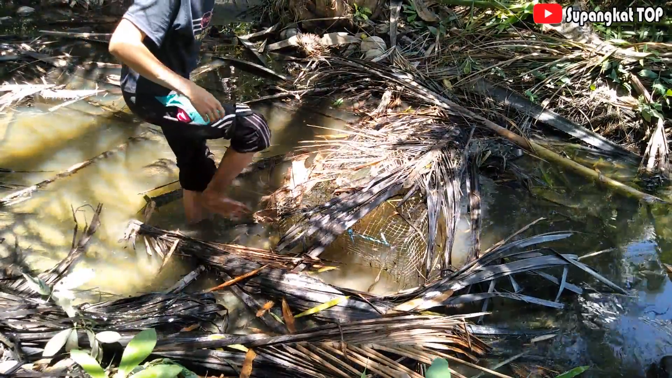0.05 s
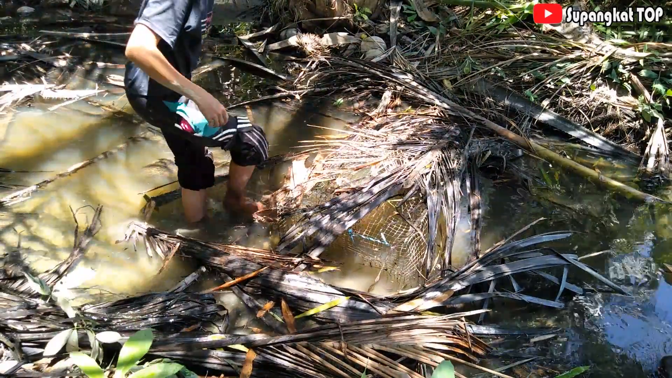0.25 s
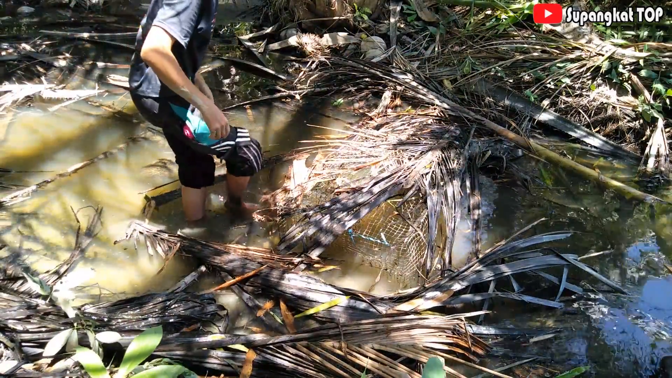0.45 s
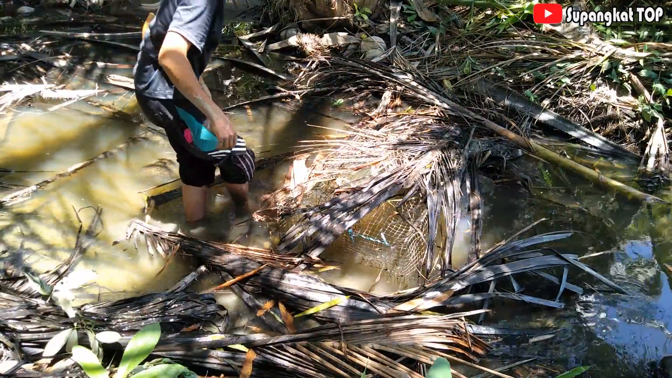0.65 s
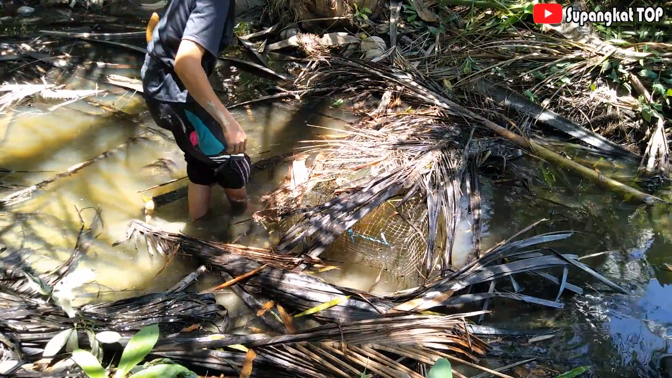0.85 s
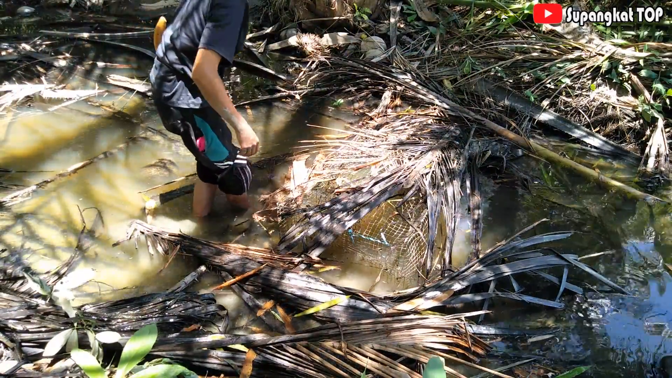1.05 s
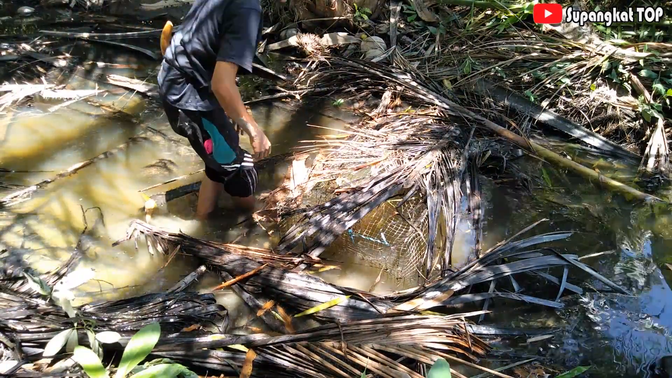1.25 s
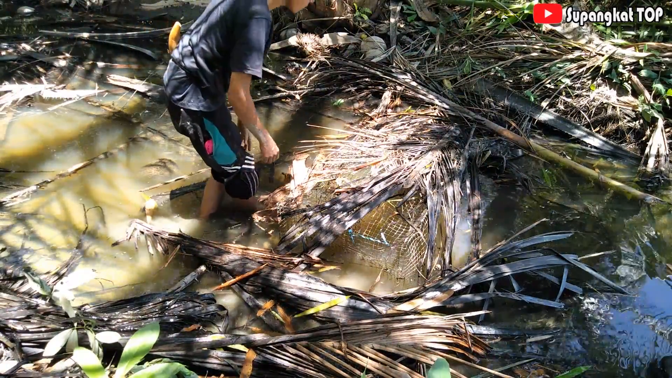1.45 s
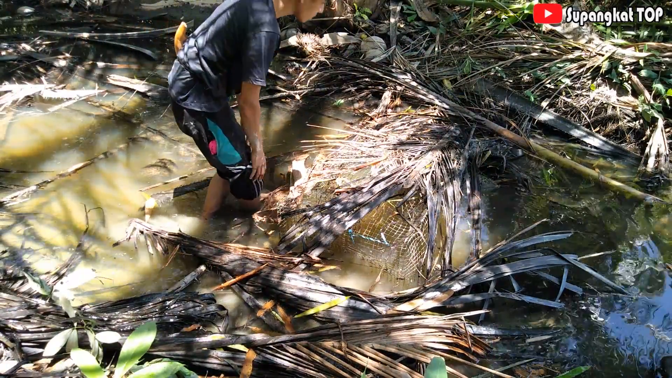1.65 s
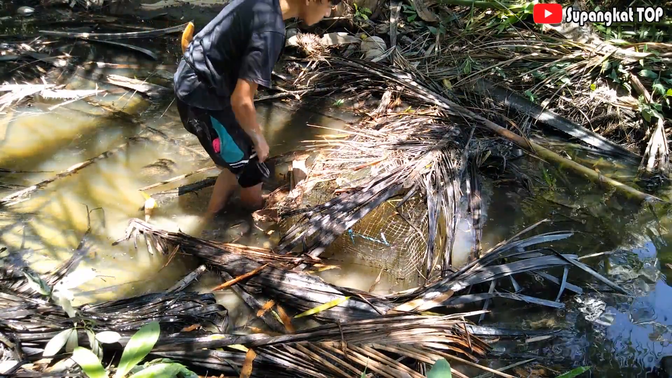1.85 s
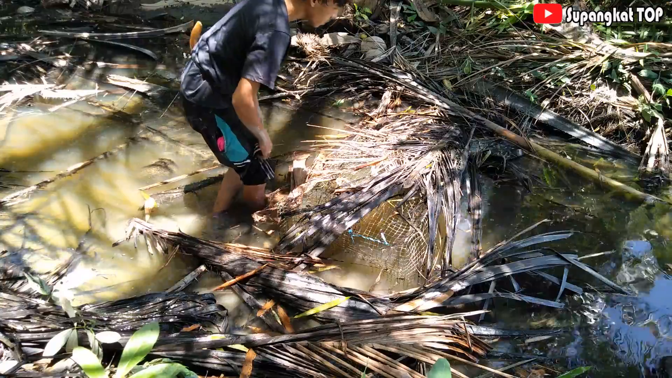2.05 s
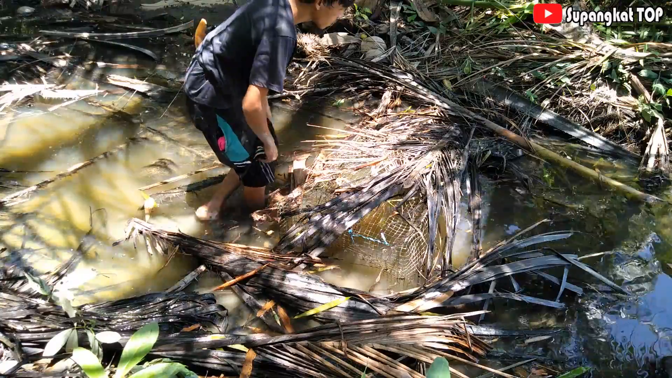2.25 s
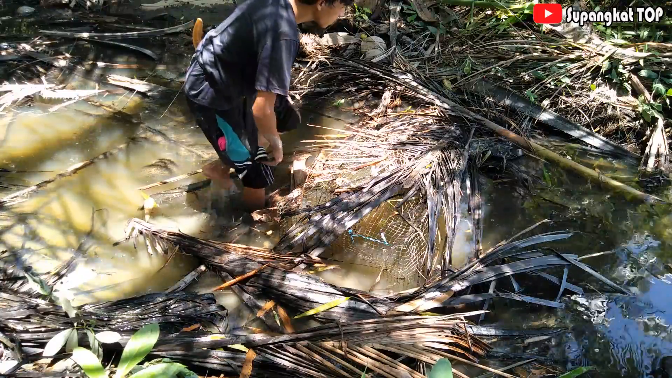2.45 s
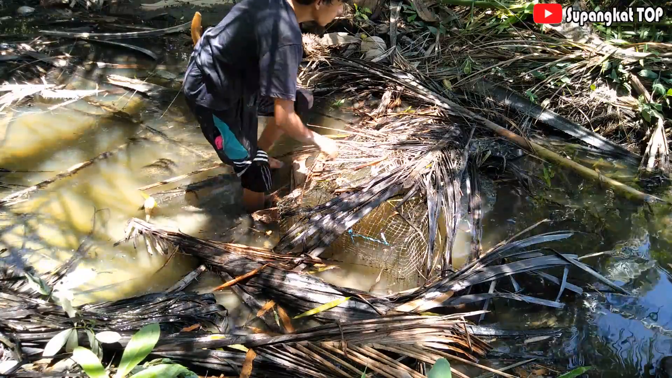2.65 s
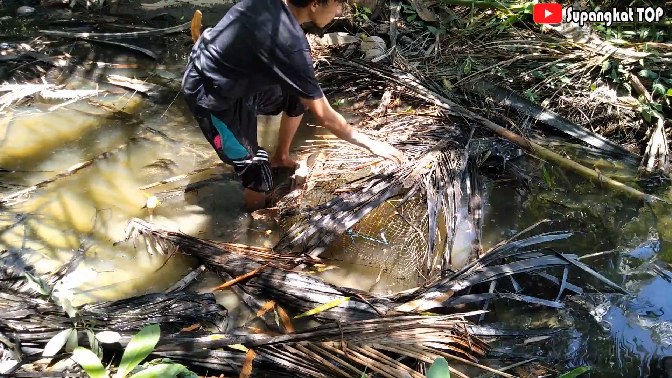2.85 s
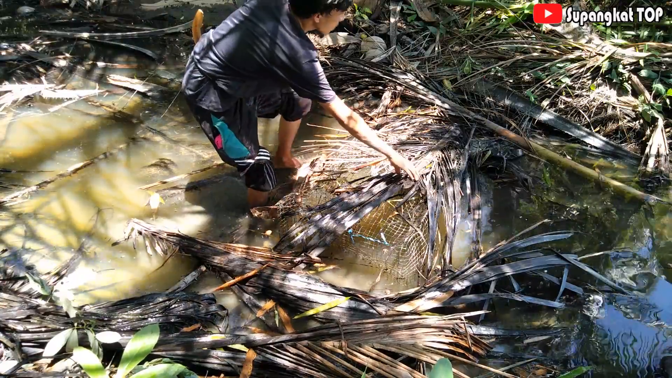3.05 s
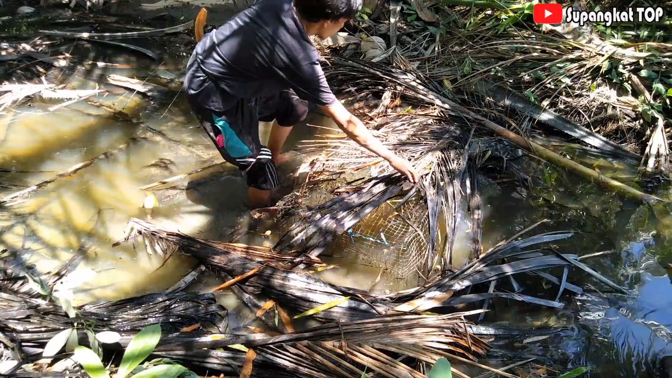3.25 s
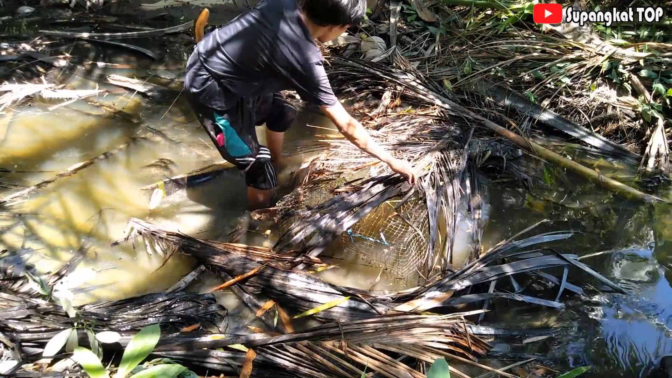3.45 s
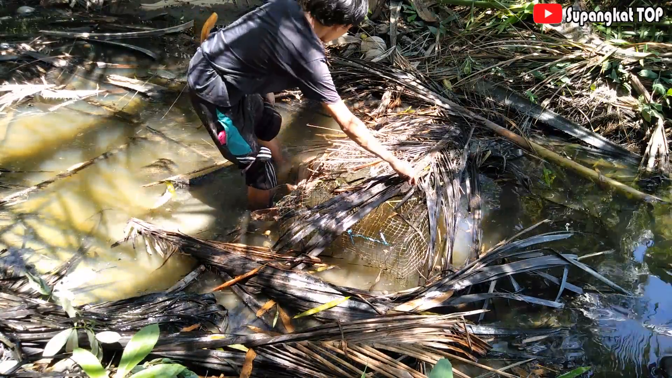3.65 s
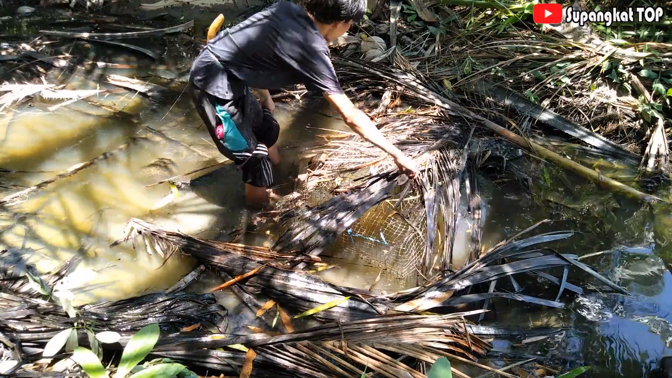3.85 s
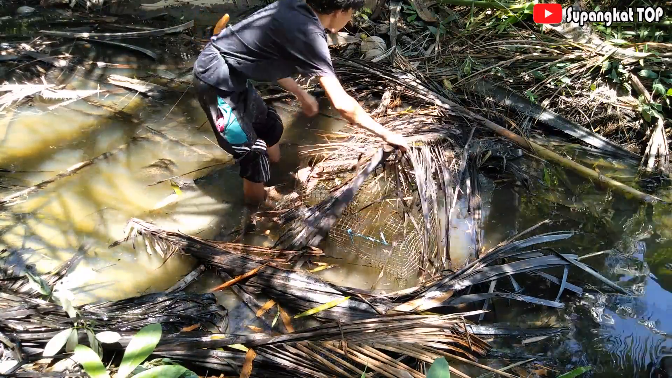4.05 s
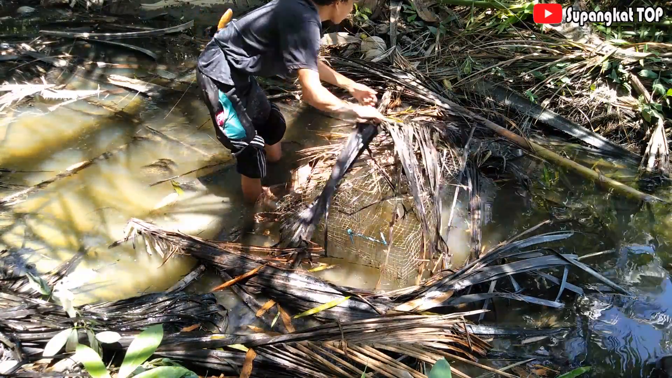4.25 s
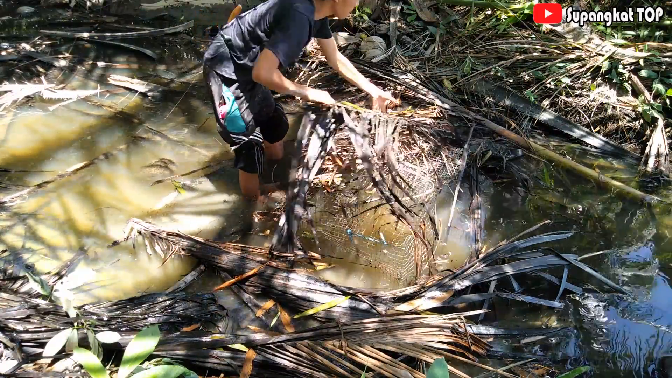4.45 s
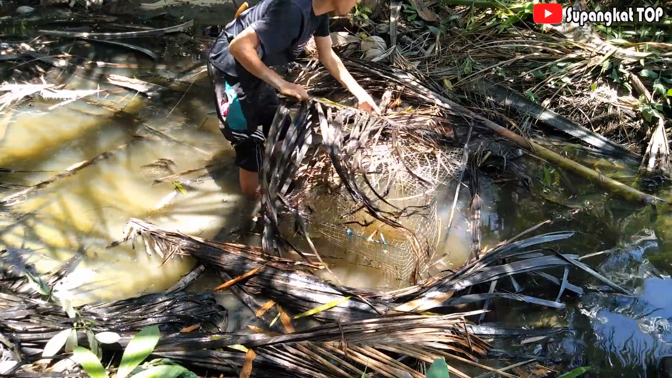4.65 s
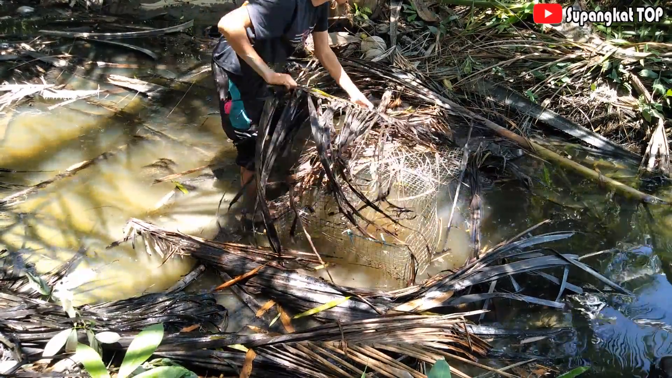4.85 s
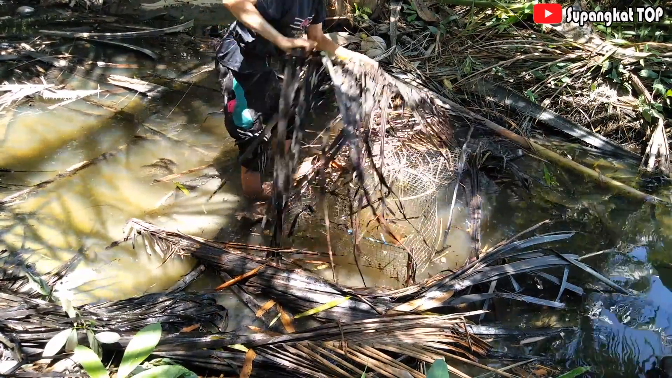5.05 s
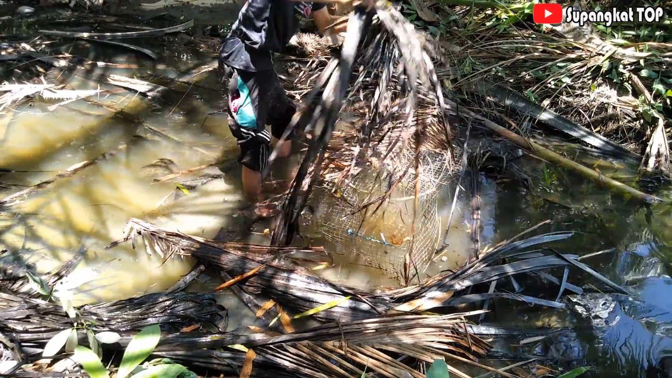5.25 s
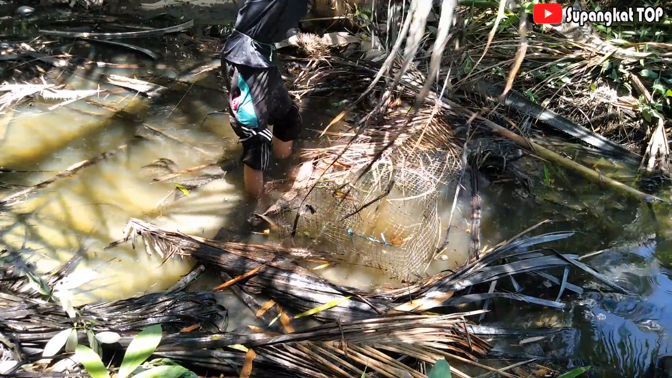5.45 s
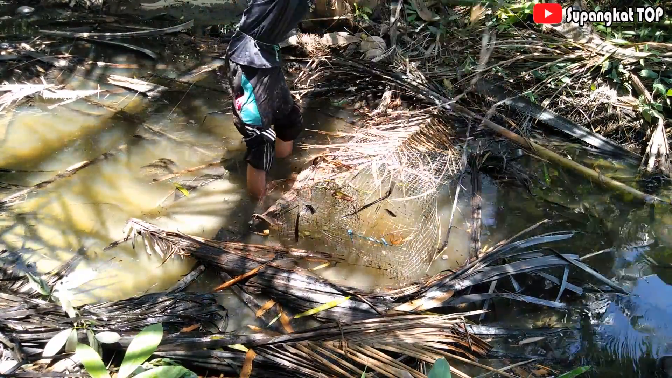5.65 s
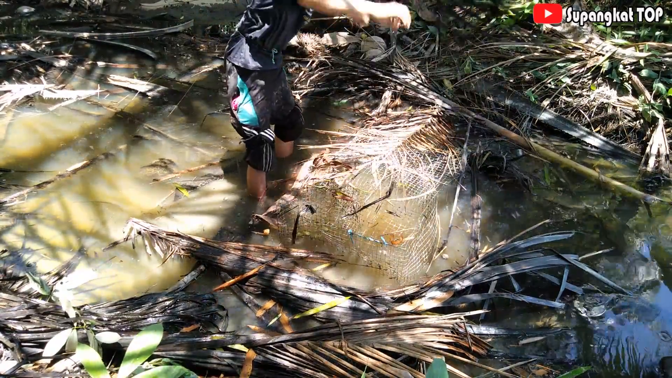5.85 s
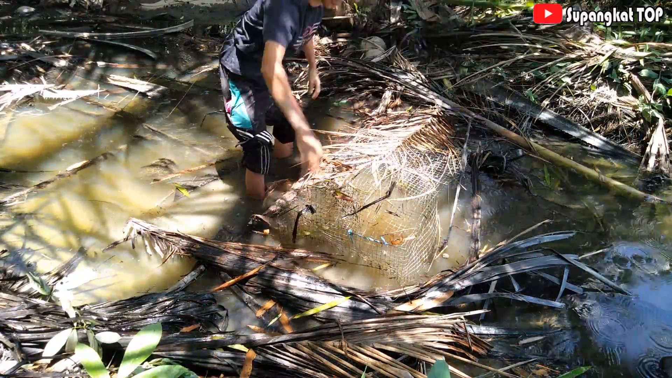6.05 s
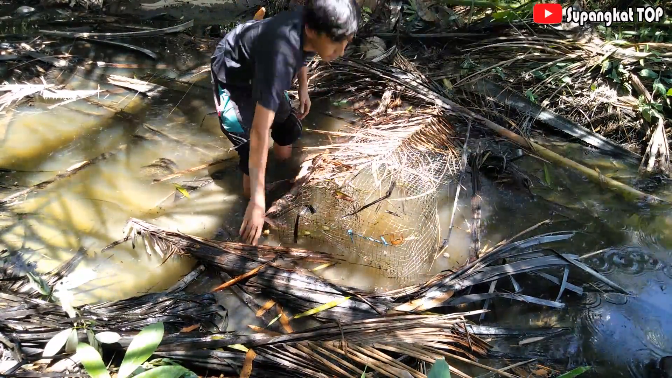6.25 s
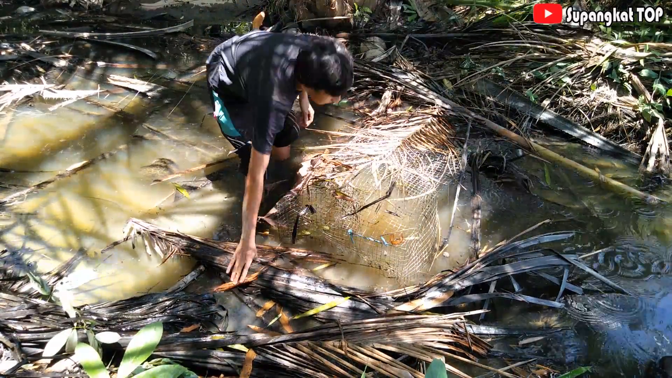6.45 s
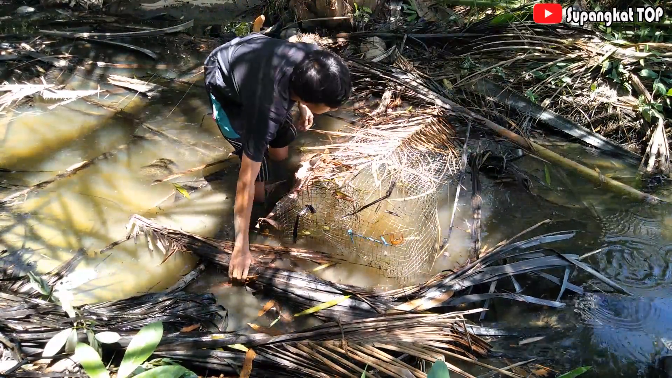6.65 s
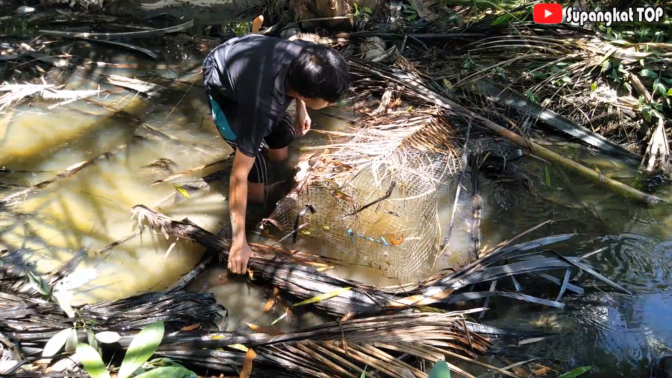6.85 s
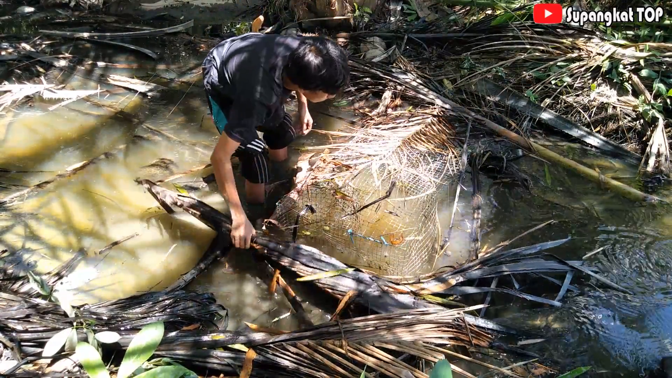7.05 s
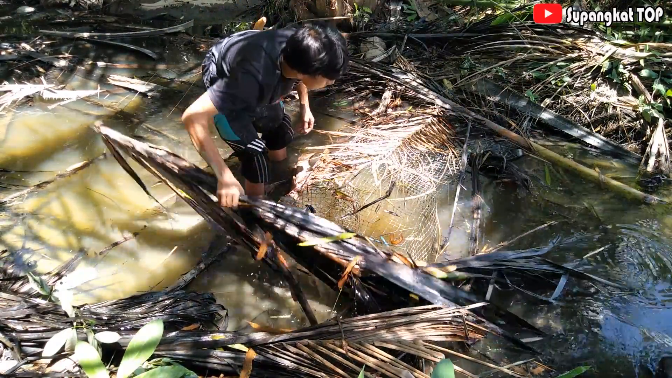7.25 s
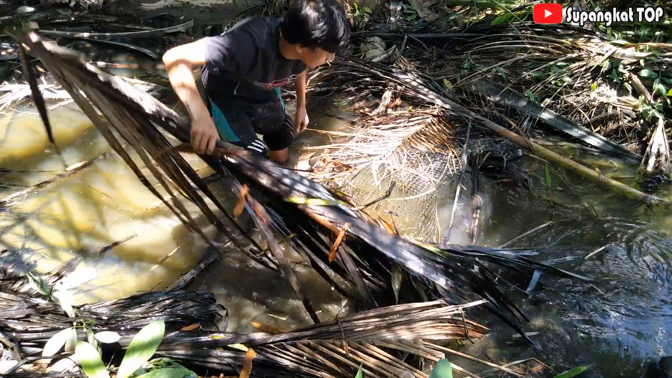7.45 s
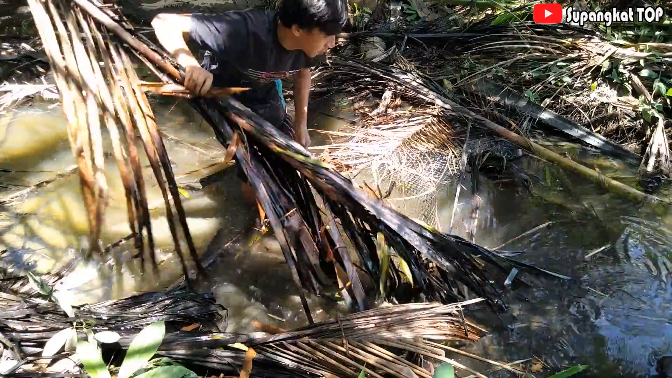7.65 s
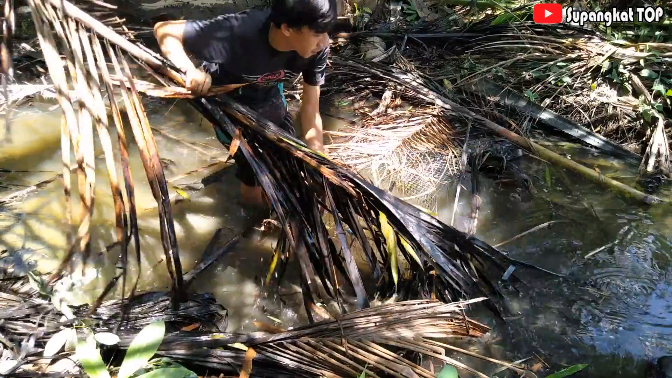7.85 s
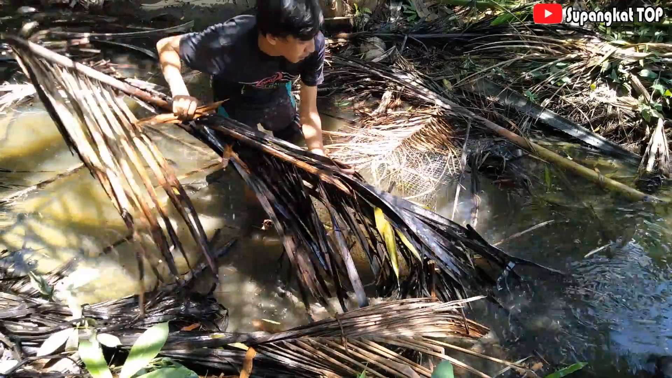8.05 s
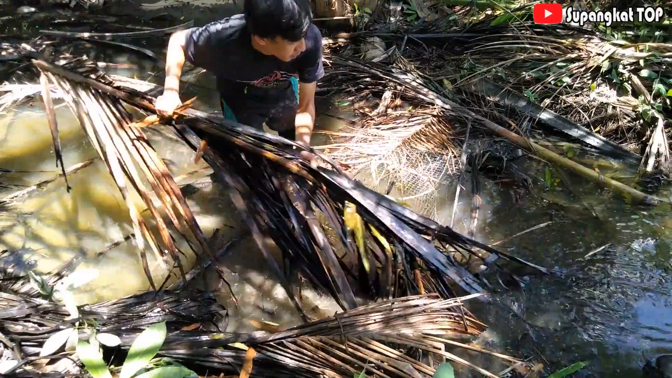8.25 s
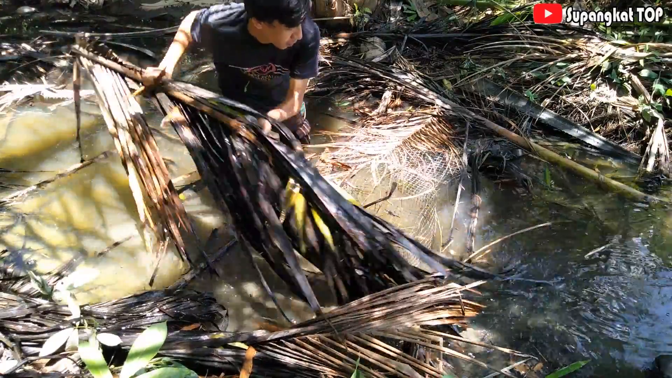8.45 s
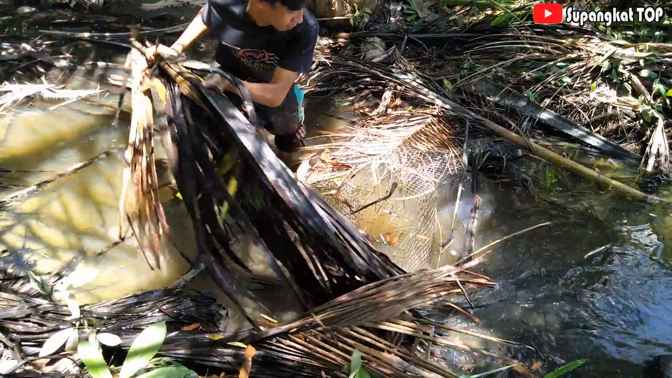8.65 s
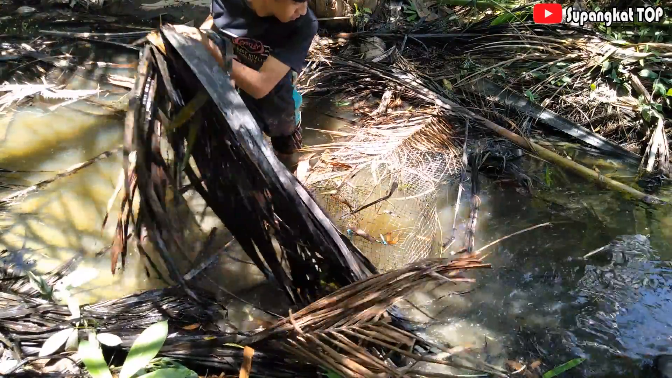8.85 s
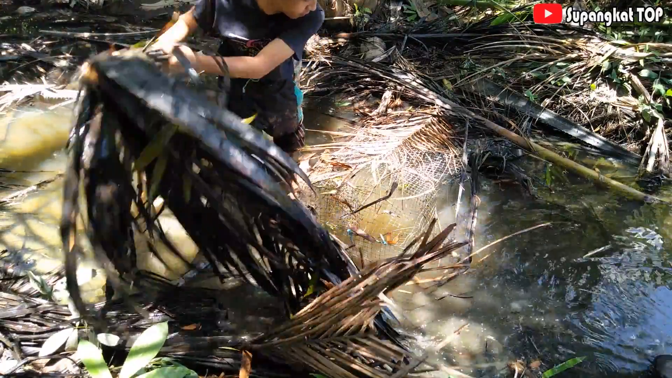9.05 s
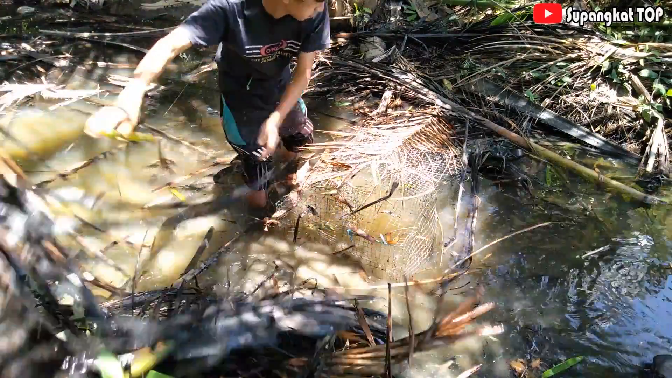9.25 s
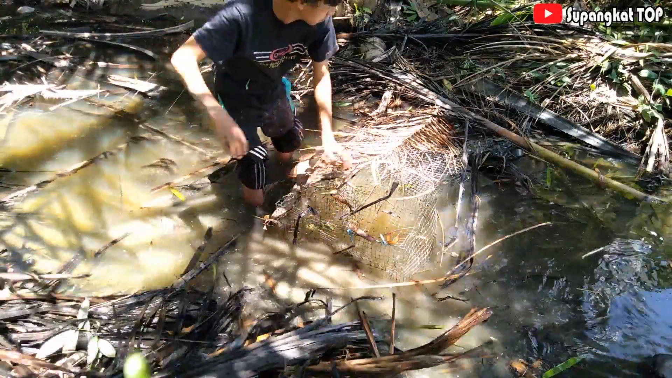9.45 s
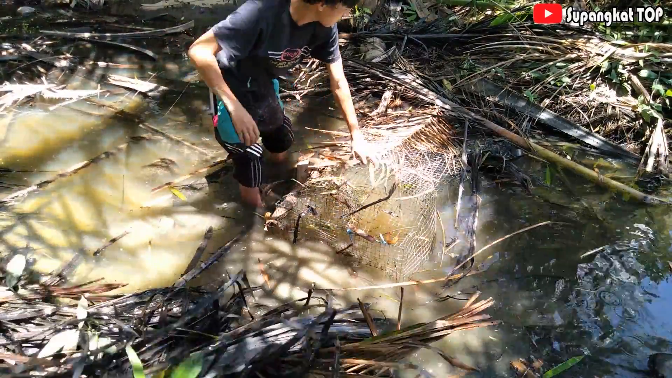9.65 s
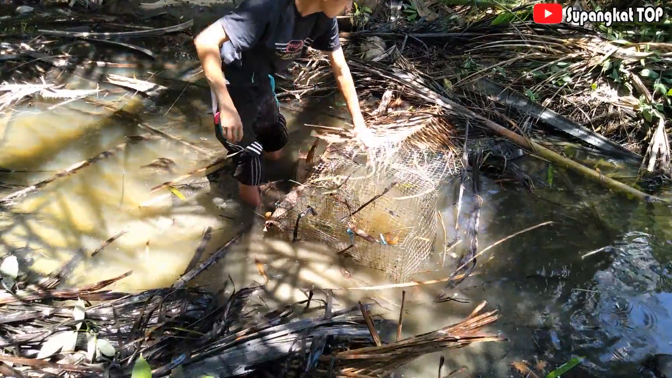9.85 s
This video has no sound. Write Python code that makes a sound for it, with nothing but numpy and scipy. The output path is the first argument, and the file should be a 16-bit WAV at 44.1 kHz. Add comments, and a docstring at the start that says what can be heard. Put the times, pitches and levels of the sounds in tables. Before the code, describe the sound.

At a shallow muddy ditch, heard close, a distant engine rumbles low under a faint, suppressed grove hiss. At 0.1-0.3 s a light plop and leaf brush; at 0.5 a deep gulp, then tiny drips. Near 2.5 a splashing step rings with bubbles and dry crackle, fading by 3; a small snap and rustle at 3.2, soft plops after. From 4 fronds rustle as they lift, with light trickles, sparse snaps and a thin faint whistle around 5.2. At 5.9-6.1 they land with sharp cracks, a bright crunch, splash and dull thud. Drips follow until 6.9. From 7 another frond is dragged out, water spraying and sloshing, leaves crackling. From 8.3 it grows denser, with a hard snap and splash at 8.9, then a broad crashing landing at 9.3-9.5, a sharp splat at 9.67 and subsiding rustle to 9.9. The engine hum becomes slightly clearer late.

```python
"""Palm fronds dragged from a ditch

Someone wades in a shallow muddy ditch, drags dry palm fronds out of the water and throws them aside.
Leaves crackle (bright grains and noise) and snap (clicks); water sloshes (bubble grains), drips and plops
(damped sines). Far off, an engine rumbles under the grove's hiss (shaped noise and a wavering sine).
A noise suppressor turns down each band above the bass when it is near its own quiet level."""
import sys
import numpy as np
from scipy import signal
from scipy.fft import rfft, irfft, next_fast_len
from scipy.io import wavfile
from scipy.ndimage import uniform_filter1d, minimum_filter1d, map_coordinates

SR = 44100
rng = np.random.default_rng(int(sys.argv[2]) if len(sys.argv) > 2 else 0)


def put_to_file(sound):
    """Save the sound as 16-bit audio at rate SR, in the file named by the first command-line argument."""
    columns = np.atleast_2d(sound).T  # one column per channel
    safe = np.clip(columns, -1, 1)
    whole_steps = np.round(safe * 32767)
    wavfile.write(sys.argv[1], SR, whole_steps.astype(np.int16))


N = 437031


def amp(db):
    """Gain of a level in dB."""
    return 10 ** (np.asarray(db) / 20)


def unit(x):
    """x at rms 1."""
    return x / np.sqrt(np.mean(x ** 2) + 1e-20)


def curves(*tables):
    """One value per sample for each column after the time; tables follow each other."""
    knot_s, *columns = np.transpose(np.concatenate(tables))
    return [np.interp(np.arange(N) / SR, knot_s, column) for column in columns]


def wobble(knots_per_s):
    """A smooth random curve through normally distributed knots."""
    knots = rng.standard_normal(int(N * knots_per_s / SR) + 4)
    return map_coordinates(knots, [np.arange(N) * knots_per_s / SR])


def coloured(x, spectrum):
    """x through (Hz, dB) points, 120 dB down outside them, at rms 1."""
    m = next_fast_len(N + 8192)
    hz, db = np.transpose(spectrum)
    bin_hz = np.fft.rfftfreq(m, 1 / SR)
    gain = amp(np.interp(np.log(bin_hz + 1), np.log(hz), db, left=-120, right=-120))
    return unit(irfft(rfft(x, m) * gain, m)[:N])


def noise(spectrum):
    """Steady random noise through one spectrum, at rms 1."""
    return coloured(rng.standard_normal(N), spectrum)


def pings(start_s, size, hz, cycles, rise, length, swell_cycles=0.26):
    """Damped sines, each 26 dB down after its cycles; a positive rise lifts the pitch as it dies."""
    t = np.arange(length) / SR
    turns = hz[:, None] * t
    life = turns / np.reshape(cycles, (-1, 1))
    phase = 2 * np.pi * turns * (1 + np.reshape(rise, (-1, 1)) * np.minimum(life, 2))
    envelope = np.exp(-3 * life) * (1 - np.exp(-turns / swell_cycles))
    wave = size[:, None] * np.sin(phase) * envelope
    at = np.round(start_s * SR).astype(int)[:, None] + np.arange(length)
    return np.bincount(at.ravel(), wave.ravel(), N + length)[:N]


def grains(count, length, hz, octaves, cycles, spike_db, share, spectrum):
    """Random pings of uneven strength mixed with noise; share is the pings' part of the power."""
    draw = rng.random((count, 2))
    pitch_hz = np.clip(hz * 2 ** (octaves * rng.standard_normal(count)), 100, 15000)
    strength = amp(-spike_db * np.log(draw[:, 1] + 0.0045))
    burst = pings(draw[:, 0] * N / SR, strength, pitch_hz, cycles, 0.035, length)
    # the pings have a colour of their own, so they get a flatter spectrum
    burst = coloured(burst, [(f, 0.34 * db) for f, db in spectrum])
    return np.sqrt(share) * burst + np.sqrt(1 - share) * noise(spectrum)


def bursts(start_s, db, rise_s, t60_s, hold_s=0):
    """Summed power of events: amplitude rises straight, holds, then falls 60 dB in t60_s."""
    tick_s = 0.001
    ticks = np.arange(0, N / SR + tick_s, tick_s)
    t = ticks[:, None] - start_s
    fall_s = np.clip(t - rise_s - hold_s, 0, None)
    power = np.clip(t / rise_s, 0, 1) ** 2 * amp(2 * db - 120 * fall_s / t60_s)
    return np.interp(np.arange(N) / SR, ticks, power.sum(axis=1))


# rumble level before wobble: time_s, level_db
RUMBLE_LEVEL = [(0.0, -51), (0.44, -42.5), (1.41, -39.5), (1.57, -50.5), (2.81, -45.5), (3.01, -53),
                (3.2, -42.5), (4.0, -50.5), (4.53, -43), (5.55, -45.5), (5.77, -50), (6.07, -41),
                (6.46, -44), (7.01, -53), (7.26, -43), (8.72, -46), (9.91, -44)]


def rumble_level():
    """Level in dB of the far rumble, drifting at random around its curve."""
    return curves(RUMBLE_LEVEL)[0] + 2.4 * wobble(7)


# relative rumble spectrum: freq_hz, density_db_per_hz
RUMBLE_SPECTRUM = [(12, -52), (20, -19), (27, -11.5), (61, -2.5), (86, 2), (120, -3.5), (165, -10.5),
                   (189, -21), (200, -17), (260, -49), (440, -120)]


def rumble(level_db):
    """Low noise of a far engine."""
    return amp(level_db) * noise(RUMBLE_SPECTRUM)


# engine note, before wobble: time_s, pitch_hz, peak_db
ENGINE_NOTE = [(0, 80.6, -76), (4, 80.8, -72), (7, 80.94, -51.5), (9.91, 81.44, -37.5)]


def drone():
    """Engine note: one sine, wavering in pitch and level."""
    hz, db = curves(ENGINE_NOTE)
    level = amp(db + 3.1 * wobble(3.0))
    return level * np.sin(2 * np.pi * np.cumsum(hz + 3 * wobble(5.1)) / SR)


# relative spectrum of the grove: freq_hz, density_db_per_hz
HISS_SPECTRUM = [(200, -15.5), (260, -4.5), (460, -3.5), (820, -6), (1400, -7.5), (2900, -12.5),
                 (5200, -13.5), (9300, -15.5), (12700, -19.5), (13500, -28.5), (16000, -39)]


def hiss(rumble_db):
    """Broad noise of the grove, swelling a little with the rumble."""
    level_db = -43 + 0.13 * (rumble_db - rumble_db.mean()) + 1.36 * wobble(40)
    return amp(level_db) * noise(HISS_SPECTRUM)


# fronds lifted, thrown, dragged out, thrown again; levels before clumping: time_s, rustle_db, water_db
HANDLING_LEVELS = [
    [(3.93, -71, -87), (3.97, -45.5, -73), (4.22, -37, -76), (4.5, -37, -54), (4.66, -32, -46),
     (4.86, -36, -53), (5.03, -35, -45), (5.47, -37, -59), (5.82, -45, -56), (5.89, -42, -65)],
    [(5.91, -32, -41.5), (5.97, -22, -34.5), (6.05, -18.5, -29), (6.14, -23, -38), (6.25, -34, -38),
     (6.48, -37.5, -53), (6.57, -43, -49), (6.7, -39.5, -45.5), (6.88, -52.5, -73)],
    [(6.95, -52, -69), (6.97, -39.5, -43), (7.07, -39, -48), (7.15, -40, -54), (7.3, -36, -41),
     (7.51, -31, -34), (7.69, -31, -36), (7.79, -36.5, -41.5), (7.9, -36.5, -42.5), (8.06, -37.5, -39.5),
     (8.3, -33.5, -40.5)],
    [(8.34, -32, -36.5), (8.4, -31.5, -33), (8.62, -26, -30), (8.9, -22.5, -29), (9.03, -30.5, -34.5),
     (9.2, -30.5, -32), (9.31, -25, -28), (9.36, -26.5, -31), (9.42, -20, -26.5), (9.57, -22, -25.5),
     (9.66, -31, -34.5), (9.85, -36.5, -41.5), (9.91, -33, -36.5)],
]


def handling():
    """Power of rustle, spray and slosh as fronds are moved; slosh falls away faster at low level."""
    rustle_db, spray_db = curves(*HANDLING_LEVELS)
    match_db = -25.5  # slosh equals spray here
    slosh_db = match_db + 1.796 * (spray_db - match_db)
    busy = np.arange(N) / SR > HANDLING_LEVELS[0][0][0]
    return busy * amp(2 * np.array([rustle_db, spray_db, slosh_db]))


# dry leaves brushed or crushed in one stroke, before clumping: start_s, level_db, t60_s
BRUSH_STROKES = [(.01, -37, 0.31), (.19, -45, 0.49), (0.274, -39, 0.63), (2.488, -37, 0.65), (2.6, -42, 1),
                 (2.764, -37.5, 0.52), (2.85, -38.5, 0.16), (3.201, -36, 0.27), (3.26, -40.5, 0.35),
                 (5.93, -27.5, .3), (6.055, -21, 0.41), (6.37, -29, 0.064), (8.919, -16, 0.32),
                 (9.368, -17, 0.13), (6.918, -38.5, .15)]
# relative leaf spectrum: freq_hz, density_db_per_hz
LEAF_SPECTRUM = [(1500, -29.5), (3000, -11), (4100, -14), (6200, 1), (7500, -5.5), (9300, -13),
                 (12400, -8.5), (14000, -21), (16000, -33.5)]


def rustle(handling_power, clump):
    """Leaf crackle: many grains of a few bright cycles over noise, in fast random clumps."""
    start_s, db, t60_s = np.transpose(BRUSH_STROKES)
    power = handling_power + bursts(start_s, db, rise_s=0.0021, t60_s=t60_s)
    leaf = grains(count=9000, length=48, hz=6380, octaves=0.42, cycles=2.35, spike_db=3,
                  share=0.35, spectrum=LEAF_SPECTRUM)
    flutter_db = 0.85 * clump + 0.97 * wobble(70) + 1.34 * wobble(220)
    return np.sqrt(power) * amp(flutter_db) * leaf


# foot or frond breaking the surface, before clumping: start_s, spray_db, slosh_over_spray_db, t60_s
SURFACE_SPLASHES = [(.093, -44, 5, 0.42), (2.462, -32.5, -13, 0.36), (2.491, -27.5, 0, 0.34),
                    (2.56, -35.5, -2, 0.78), (2.77, -38.5, -22, 0.29), (2.855, -54, -8, 0.12),
                    (3.201, -48, 9.5, .4), (4.745, -41, -18, .3), (4.95, -42, -39, 0.91),
                    (5.22, -49, -20, 0.27), (5.925, -36, -3, 0.34), (5.966, -38.5, 8.5, .6),
                    (6.055, -21, -1.5, 0.53), (6.64, -45.5, -0.5, .6), (7.071, -41.5, -3, 0.37),
                    (7.351, -35, -9, 0.42), (7.487, -32, -18, 0.49), (7.65, -29, -21, 0.28),
                    (7.866, -32, -36, 0.22), (7.927, -33, -5, 0.48), (8.36, -42, -3, .5),
                    (8.596, -28.5, -4.5, 1), (8.916, -30.5, 1.5, 0.64), (9.3, -31, 5, 0.23),
                    (9.367, -23, -4, 0.97), (9.671, -21.5, -1, 0.056)]
# relative spectrum of small bubbles: freq_hz, density_db_per_hz
SPRAY_SPECTRUM = [(500, -51), (1100, -7), (1700, -0.5), (3000, 1), (4000, -2.5), (6000, -10.5)]
# relative spectrum of large bubbles: freq_hz, density_db_per_hz
SLOSH_SPECTRUM = [(290, -32), (430, -8.5), (600, -4), (900, -3), (1250, -4), (2000, -13)]


def water(spray_power, slosh_power, clump):
    """Spray of small bubbles and slosh of large ones: ringing grains over noise, in clumps."""
    start_s, db, slosh_over_db, t60_s = np.transpose(SURFACE_SPLASHES)
    rise_s = 0.0021
    spray_power = spray_power + bursts(start_s, db, rise_s, t60_s)
    slosh_power = slosh_power + bursts(start_s, db + slosh_over_db, rise_s, t60_s)
    spray = grains(count=8000, length=300, hz=2210, octaves=0.63, cycles=7.6, spike_db=1.9,
                   share=0.55, spectrum=SPRAY_SPECTRUM)
    slosh = grains(count=1400, length=700, hz=772, octaves=0.56, cycles=3.2, spike_db=2.0,
                   share=0.39, spectrum=SLOSH_SPECTRUM)
    spray = np.sqrt(spray_power) * amp(1.05 * clump + 1.26 * wobble(150)) * spray
    slosh = np.sqrt(slosh_power) * amp(0.51 * clump + 1.1 * wobble(40)) * slosh
    return spray + slosh


def stirring():
    """Leaves and water moved together, sharing one random clumping."""
    rustle_power, spray_power, slosh_power = handling()
    clump = wobble(35)
    return rustle(rustle_power, clump) + water(spray_power, slosh_power, clump)


# air pockets closing in water: start_s, amplitude_db (before envelope), pitch_hz, life_cycles, rise_ratio
AIR_POCKETS = [(.092, -30, 720, 8.4, 0.04), (.094, -27.5, 1366, 10.5, 0.04), (.096, -34, 1980, 25, 0),
               (.469, -14.5, 318, 7.4, 0.06), (.547, -30, 3300, 14, 0), (.608, -32.5, 2780, 13, 0),
               (.572, -29, 1430, 8, 0.04), (.901, -29.5, 1920, 17, 0.04), (.934, -33.5, 3100, 23, 0.02),
               (.992, -34.5, 2140, 24, 0), (2.42, -16.5, 2480, 8.9, 0.04), (2.46, -26, 964, 30, 0.06),
               (2.483, -13.5, 1102, 40, 0.17), (2.493, -10, 850, 22.4, 0.12), (2.512, -12, 3650, 10, 0.03),
               (2.569, -17.5, 1260, 14, 0), (2.626, -21, 2400, 13, 0), (2.706, -25, 2276, 18, 0),
               (2.861, -36, 896, 22, 0), (2.753, -23.5, 3880, 15, 0), (2.772, -28.5, 1016, 12, 0),
               (2.777, -20, 3100, 11, 0.07), (2.797, -24.5, 1690, 14, 0.08), (3.13, -29.5, 372, 5.9, 0),
               (3.206, -25.5, 1117, 15, 0.03), (3.215, -24.5, 604, 21, 0.06), (3.45, -29.5, 1115, 8.6, .02),
               (3.622, -26.5, 1130, 10.6, 0.04), (3.54, -30.5, 5500, 29, 0), (3.564, -31.5, 5500, 30, 0.02),
               (3.667, -28.5, 804, 12.6, 0.03), (4.57, -29.5, 1250, 9.9, 0.01), (4.742, -28.5, 2326, 17, 0),
               (4.754, -29, 1200, 11, 0.08), (4.783, -30.5, 1245, 13, 0.06), (4.889, -36.5, 1250, 19, 0),
               (4.979, -26, 960, 45, .7), (5.012, -29, 860, 32, .01), (5.062, -33, 395, 8.6, 0.01),
               (5.222, -34.5, 1463, 48, 0), (5.231, -26, 2100, 13, 0), (5.588, -23.5, 3160, 22, 0.06),
               (5.643, -29, 658, 8.1, 0.19), (6.059, -7, 757, 12, 0.12), (6.062, -14, 480, 6, 0.03),
               (6.059, -15, 1340, 14, 0), (6.057, -8, 2870, 12, 0), (6.066, -11, 226, 3.3, 0.1),
               (6.239, -20, 854, 13, 0), (6.402, -29.5, 1100, 15, 0), (6.515, -32, 2200, 20, 0),
               (6.553, -32, 1300, 12, 0.04), (6.633, -25.5, 1940, 10.5, 0.02),
               (6.644, -28, 840, 12.4, 0.01), (6.674, -31, 1170, 10, 0.04), (6.697, -25, 1130, 19, 0.04),
               (6.735, -30, 1130, 9.9, 0.07), (6.766, -21.5, 1100, 6.6, 0.01), (6.791, -33, 1065, 19, 0),
               (6.958, -35, 860, 18, 0), (7.073, -25, 1420, 12, 0.03), (7.073, -30.5, 840, 12, 0),
               (7.074, -27, 2170, 10, 0.03), (7.131, -26.5, 1950, 10, 0), (7.33, -30.5, 1040, 14, 0.1),
               (7.353, -16.5, 1650, 9.1, 0.02), (7.392, -25.5, 914, 34, 0.1), (7.497, -18, 900, 3, 0.05),
               (7.524, -22, 2300, 12, .02), (7.601, -20, 2660, 20, 0), (7.642, -18, 2350, 14, 0.1),
               (7.661, -24.5, 1193, 14, 0.15), (7.68, -16, 2750, 16, 0.06), (7.812, -15, 2990, 10, 0.03),
               (7.885, -15, 2700, 10, 0.07), (7.96, -21, 2000, 10, 0), (8.525, -25, 770, 14, 0.02),
               (9.301, -14, 533, 5.3, 0.1), (9.535, -4.5, 2620, 12, 0), (7.788, -28, 2130, 78, 0.06),
               (7.867, -28.5, 1280, 20, 0), (7.894, -29.5, 368, 6.9, 0), (7.93, -22.5, 602, 36, 0.08),
               (8.1, -29.5, 1510, 34, 0.01), (8.193, -29.5, 600, 7.4, 0), (8.361, -19.5, 794, 29, 0.03),
               (8.416, -14, 2400, 10, 0), (8.751, -13.5, 1023, 7.3, 0), (8.921, -7.5, 2130, 9, 0),
               (9.318, -4, 2770, 25, 0), (9.372, -7, 2850, 6, .02), (9.472, -9, 920, 8.6, 0.05),
               (9.6726, 6, 1990, 2.4, 0.03), (9.878, -27, 1637, 10, 0)]


def plops():
    """Each pocket rings briefly at its size's pitch."""
    start_s, db, hz, cycles, rise = np.transpose(AIR_POCKETS)
    swell_cycles = np.clip(0.09 * cycles, 0.3, 1.5)[:, None]
    return pings(start_s, amp(db), hz, np.maximum(cycles, 1), rise, 2560, swell_cycles)


# dry leaves and stems breaking: start_s, amplitude_db (before envelope), pitch_hz, knock_over_crack_db
BREAKS = [(0.2747, -15, 5220, -44), (2.5141, -16.5, 4220, -3), (2.633, -23, 5150, -20),
          (2.848, -24.5, 5200, -20), (2.769, -19.5, 5200, -11), (3.2076, -12.5, 7230, -18),
          (3.2884, -21.5, 6240, -27), (4.3989, -19.5, 6210, -17), (4.665, -19, 6140, -20),
          (5.1462, -26, 5360, -33), (5.224, -19, 5170, -11), (5.38, -13, 6660, -24),
          (5.391, -16, 6800, -25), (5.4526, -14, 6400, -30), (5.658, -13.5, 6250, -14),
          (5.7617, -17.5, 6400, -11), (5.909, -13.5, 6020, -22), (5.9297, -2, 6100, -24),
          (5.982, -2, 6200, -27), (5.884, -21, 5500, -6), (6.373, -11.5, 6100, -37),
          (6.392, -41, 5493, -20), (7.488, -17, 6200, -2), (7.499, -24, 6200, 1), (7.54, -14, 6300, -14),
          (7.655, -12, 6300, -5), (7.881, -14, 6700, -12), (7.9201, -10.5, 6550, -26),
          (8.2283, -17.5, 6170, -2), (8.2662, -9, 6400, -19), (8.311, -11, 6460, -21),
          (8.4206, -12, 5400, -20.5), (8.518, -11, 6230, -10), (8.62, -3, 6000, -15),
          (8.7504, -5, 6260, -4.5), (8.806, -4, 5970, -17), (8.921, 7, 6140, -4.5),
          (9.1357, -12, 6220, -11), (9.264, -6.5, 6480, -23), (9.371, -2.5, 5030, -18),
          (9.3754, -8, 5500, 4), (9.4445, -3, 6060, -5), (9.4752, -5, 6000, 8.5), (9.495, 0, 6100, -7),
          (9.6728, -6.5, 6240, -22), (9.741, -17, 5990, -15)]


def snaps():
    """A click of a few bright cycles, a higher edge, and a short woody knock of the stem below."""
    start_s, db, hz, knock_db = np.transpose(BREAKS)
    scatter = rng.standard_normal((len(start_s), 2))
    edge_hz = 11500 * 2 ** (0.12 * scatter[:, 0])
    knock_hz = 2300 * 2 ** (0.24 * scatter[:, 1])
    crack = pings(start_s, amp(db), hz, cycles=9.6, rise=0, length=256)
    edge = pings(start_s, amp(db - 7.5), edge_hz, cycles=5, rise=0, length=256)
    knock = pings(start_s, amp(db + knock_db), knock_hz, cycles=2.9, rise=0, length=256)
    return crack + edge + knock


# thin whistles, perhaps an insect: start_s, length_s, pitch_hz, glide_hz_per_s, rms_db (before throb)
WHISTLE_NOTES = [(0.297, 0.088, 2340, -500, -49), (5.16, 0.74, 3200, -82.5, -50.5),
                 (6.331, 0.425, 2686, -100, -53)]


def whistles():
    """Narrow, slightly unsteady gliding sines with a light throb."""
    rise_s, fall_s = 0.0088, 0.036
    t, out = np.arange(N) / SR, 0
    throb = np.sqrt(2) * amp(2.8 * wobble(45))  # sqrt(2): sine peak from rms
    waver_turns = 20 * np.cumsum(wobble(200)) / SR
    for start_s, length_s, hz, glide, db in WHISTLE_NOTES:
        age = t - start_s
        gate = np.clip(age / rise_s, 0, 1) * np.clip((start_s + length_s - t) / fall_s, 0, 1)
        turns = hz * age + glide * age ** 2 / 2 + waver_turns
        out = out + gate * amp(db) * np.sin(2 * np.pi * turns)
    return throb * out


# thin streams off a leaf, bubbles of one size: start_s, length_s, pitch_hz, amplitude_db (before scatter)
STREAMS = [(2.424, 0.042, 2490, -37.5), (2.7, .09, 2350, -41), (2.71, .15, 1730, -38),
           (2.76, .12, 3100, -40), (2.65, .12, 5270, -35.5), (3.194, .06, 2420, -43),
           (3.194, .09, 3500, -41.5), (4.6, .17, 2130, -38), (4.89, .08, 1203, -43.5),
           (6.55, .3, 1176, -40), (7.075, .26, 1910, -33), (8.06, .19, 1870, -39), (4.6, .12, 3230, -41),
           (4.96, .15, 2900, -38.5)]


def trickles(count=24):
    """Bubbles close on each other's heels, their pitch and strength scattered a little."""
    start_s, length_s, hz, db = np.repeat(STREAMS, count, axis=0).T
    total = len(start_s)
    when = (np.arange(total) % count + rng.random(total)) / count
    chance = rng.standard_normal((2, total))
    bubble_hz = hz * 2 ** (0.11 * chance[1])
    return pings(start_s + when * length_s, amp(db + 3.6 * chance[0]), bubble_hz,
                 cycles=16.7, rise=0.049, length=1024)


# heavy fronds landing on water, before wobble: loudest_s, level_db, swell_s, hold_s
LANDINGS = [(6.059, -26, 0.017, 0.022), (9.384, -31, 0.057, 0.16)]
# relative thud spectrum: freq_hz, density_db_per_hz
BOOM_SPECTRUM = [(90, -27), (140, -8.5), (220, -8.5), (330, -4), (450, -6.5), (700, -33)]


def thuds():
    """A dull low surge of noise as the water takes the weight."""
    loudest_s, db, swell_s, hold_s = np.transpose(LANDINGS)
    power = bursts(loudest_s - swell_s, db, swell_s, t60_s=0.49, hold_s=hold_s)
    return np.sqrt(power) * amp(0.81 * wobble(25)) * noise(BOOM_SPECTRUM)


def banks_echo(near):
    """Soft echo off the banks: 200 samples late, smeared by decaying noise (t60 0.19 s)."""
    t = np.arange(SR // 8) / SR
    banks = rng.standard_normal(len(t)) * amp(-60 * t / 0.19)
    return signal.fftconvolve(np.pad(near, (200, 0)), banks / np.linalg.norm(banks))[:N]


def scene():
    """Everything near, with its echo, over the distant engine and grove."""
    rumble_db = rumble_level()
    distance = rumble(rumble_db) + drone() + hiss(rumble_db)
    near = stirring() + plops() + snaps() + whistles() + trickles() + thuds()
    return (near + amp(-13.5) * banks_echo(near) + distance)[None]


def suppress(x, margin_db, soft_db, depth_db, release_db_per_frame, low_hz):
    """A band opens when it rises over its quiet level, holds, then closes again; the bass passes."""
    hz, _, z = signal.stft(x, SR, nperseg=512, noverlap=320)
    power = uniform_filter1d(np.abs(z) ** 2, size=2, axis=0)
    power = uniform_filter1d(power, size=3, axis=1)
    level_db = 10 * np.log10(np.abs(power) + 1e-20)
    ranked_db = np.sort(level_db[:, ::4], axis=1)  # every 4th frame
    quiet_db = uniform_filter1d(ranked_db[:, z.shape[1] // 24], size=5)
    excess = (level_db - quiet_db[:, None] - margin_db) / soft_db
    cut_db = depth_db / (1 + np.exp(np.clip(excess, -30, 30)))
    cut_db = minimum_filter1d(cut_db, size=11, axis=1, origin=4)  # hold, mostly after the sound
    ramp_db = release_db_per_frame * np.arange(z.shape[1])  # limits how fast the cut deepens
    cut_db = np.minimum.accumulate(cut_db - ramp_db, axis=1) + ramp_db
    cut_db[hz < low_hz] = 0
    return signal.istft(z * amp(-cut_db), SR, nperseg=512, noverlap=320)[1][:N]


def record(dry):
    """Noise suppressor, soft ceiling, band limit."""
    x = suppress(dry[0], margin_db=10.5, soft_db=2.5, depth_db=20.0, release_db_per_frame=1.3, low_hz=190)
    x = x / (1 + np.abs(x) ** 8) ** (1 / 8)
    top_hz = 15850
    m = next_fast_len(N + 8192)
    return irfft(rfft(x, m) * (np.fft.rfftfreq(m, 1 / SR) < top_hz), m)[None, :N]


dry = scene()
out = record(dry)
put_to_file(out)
```